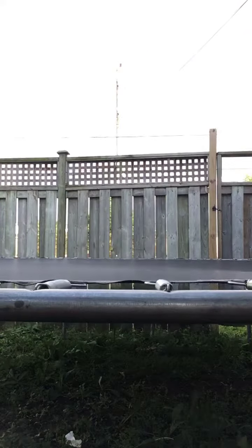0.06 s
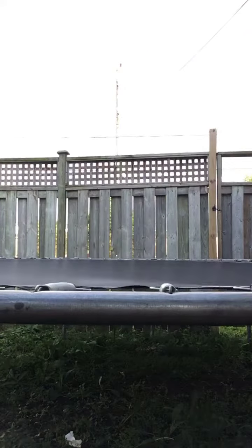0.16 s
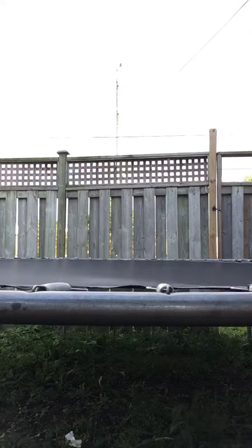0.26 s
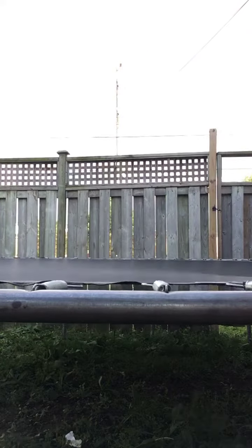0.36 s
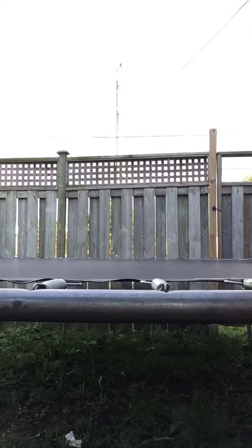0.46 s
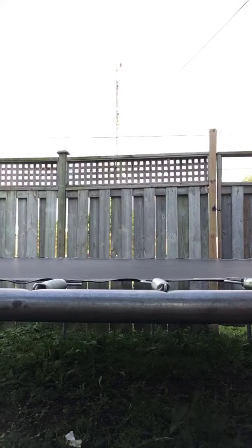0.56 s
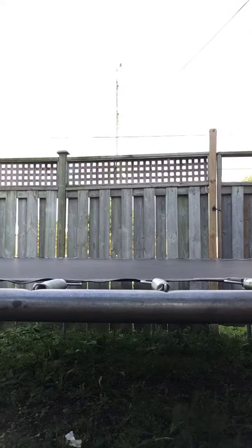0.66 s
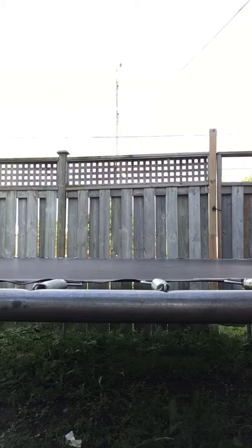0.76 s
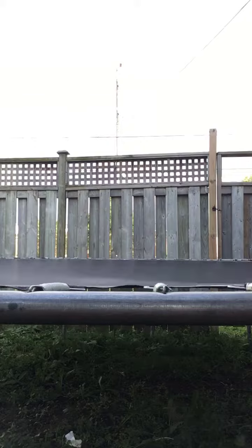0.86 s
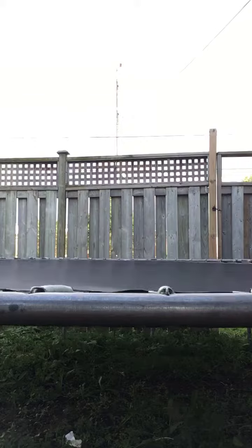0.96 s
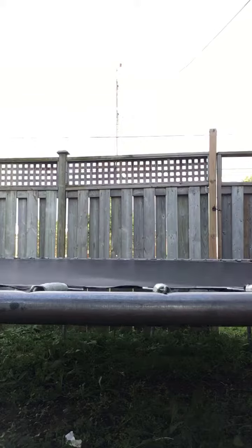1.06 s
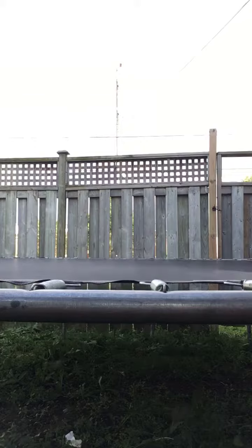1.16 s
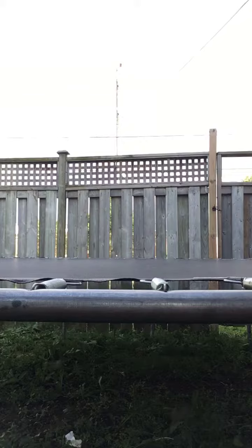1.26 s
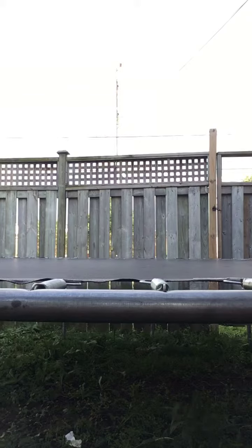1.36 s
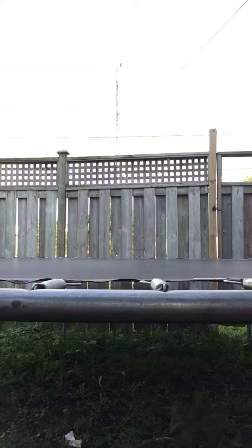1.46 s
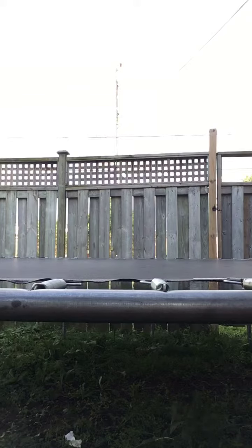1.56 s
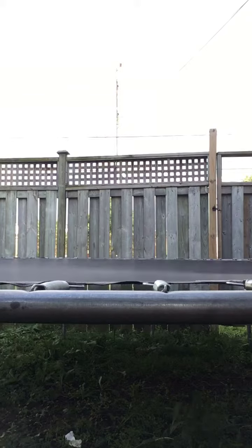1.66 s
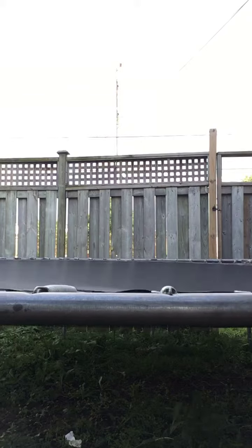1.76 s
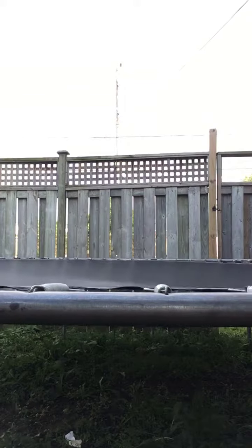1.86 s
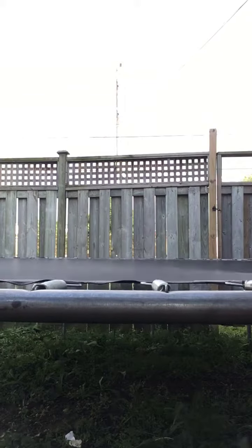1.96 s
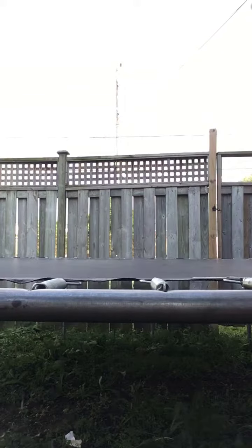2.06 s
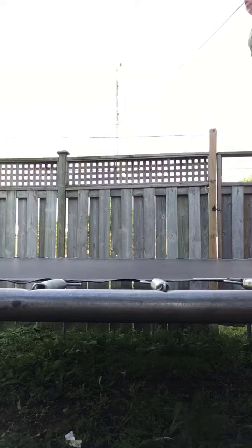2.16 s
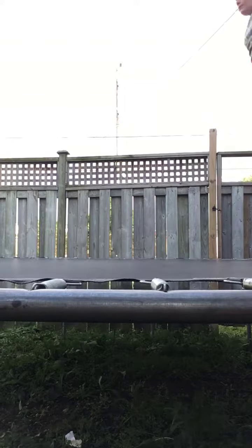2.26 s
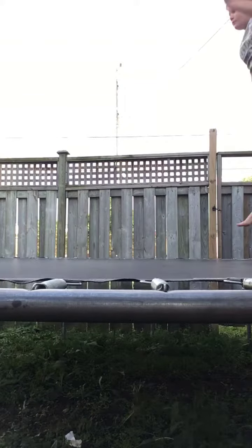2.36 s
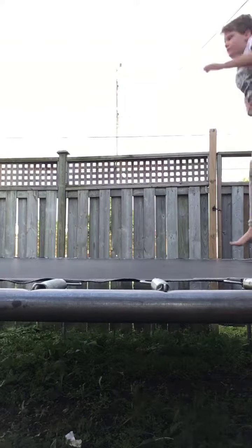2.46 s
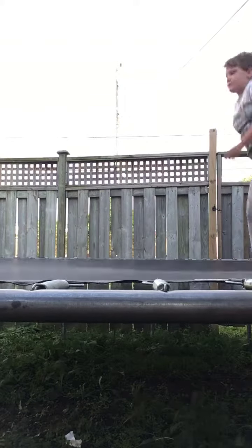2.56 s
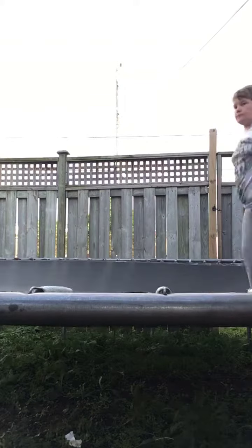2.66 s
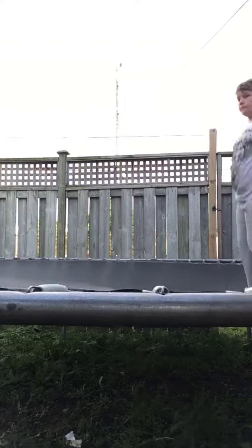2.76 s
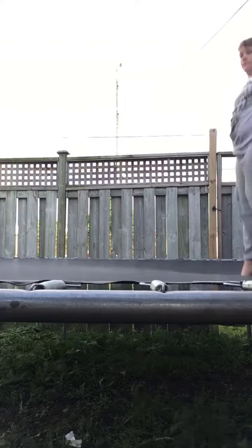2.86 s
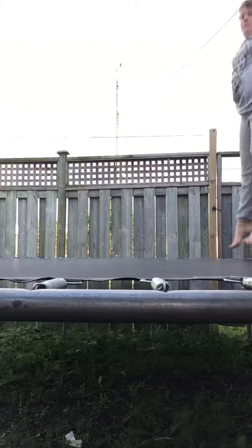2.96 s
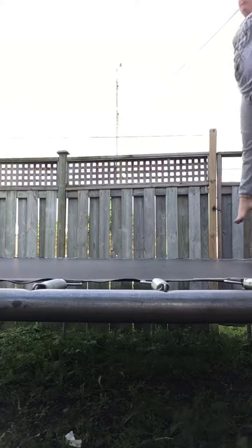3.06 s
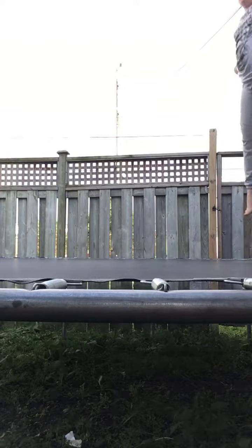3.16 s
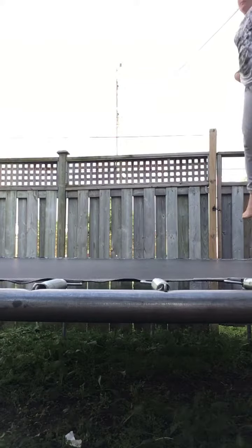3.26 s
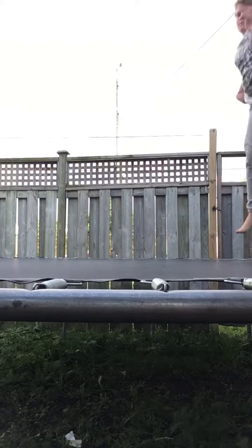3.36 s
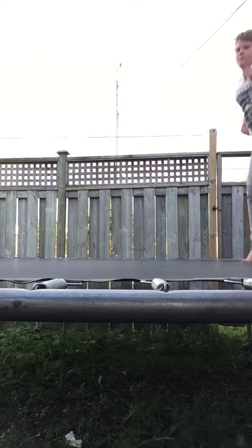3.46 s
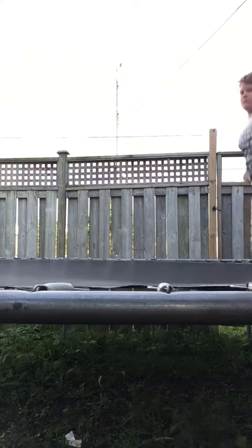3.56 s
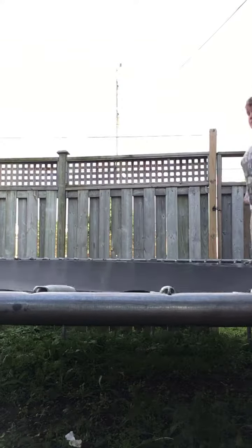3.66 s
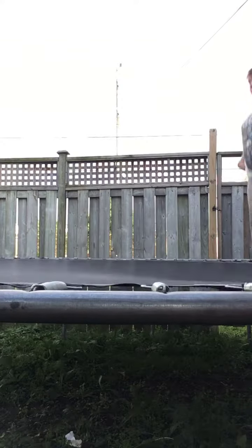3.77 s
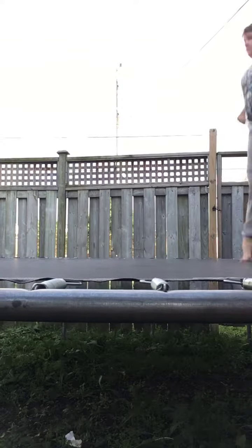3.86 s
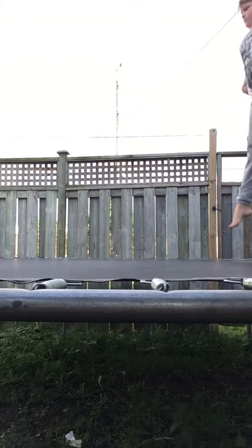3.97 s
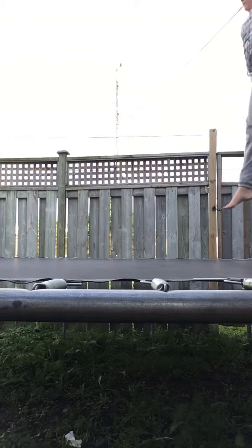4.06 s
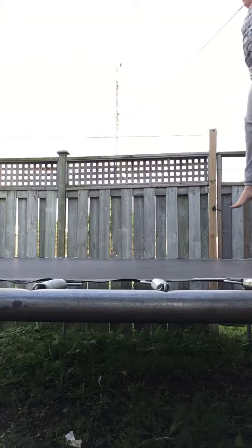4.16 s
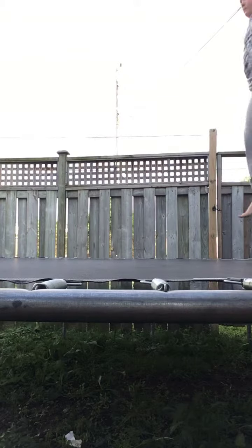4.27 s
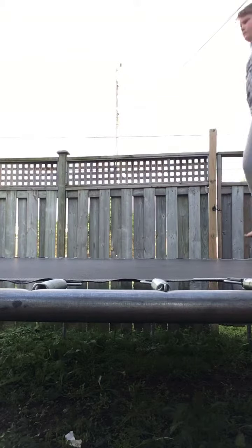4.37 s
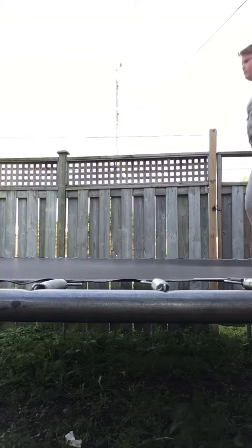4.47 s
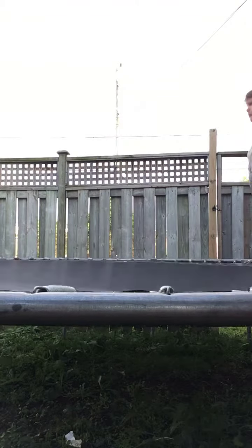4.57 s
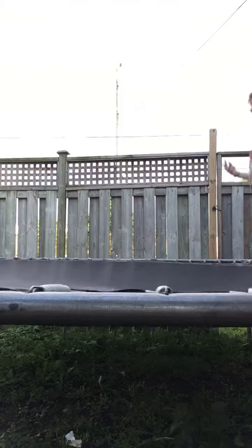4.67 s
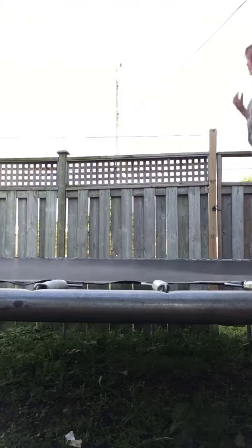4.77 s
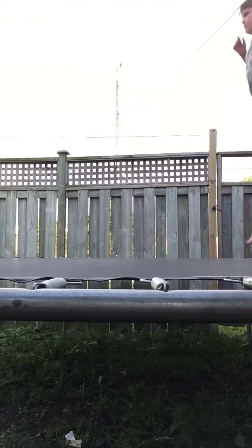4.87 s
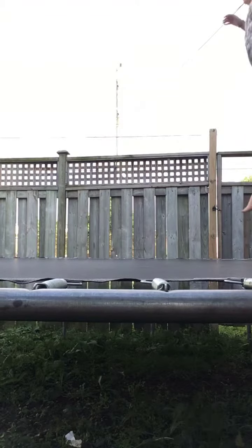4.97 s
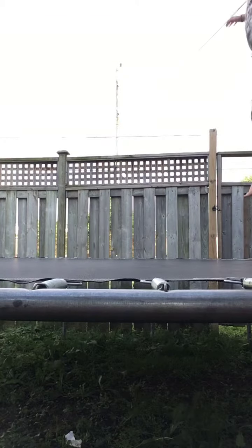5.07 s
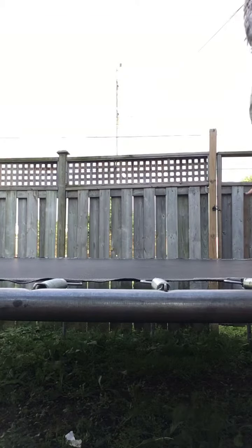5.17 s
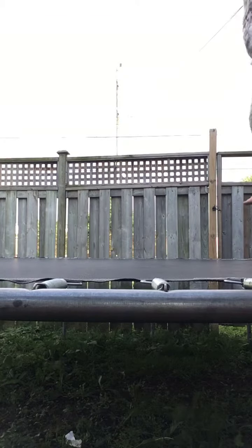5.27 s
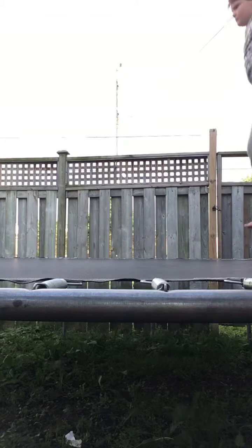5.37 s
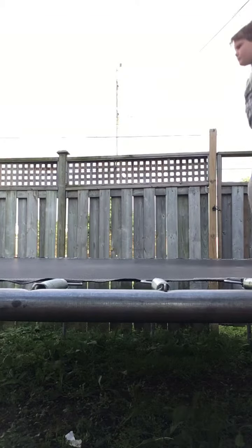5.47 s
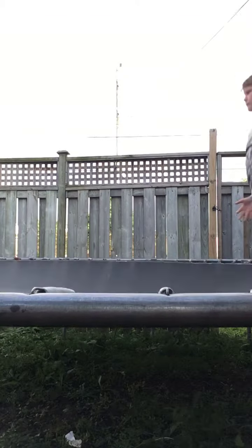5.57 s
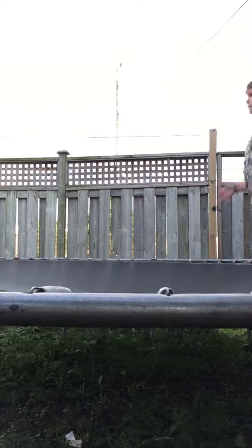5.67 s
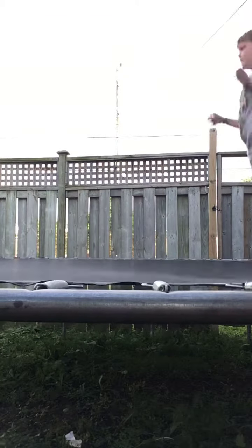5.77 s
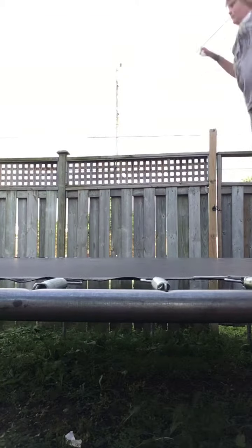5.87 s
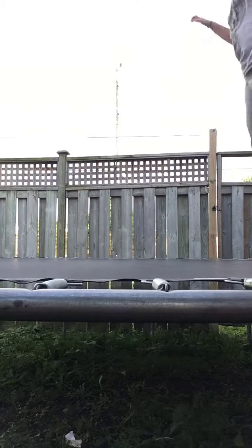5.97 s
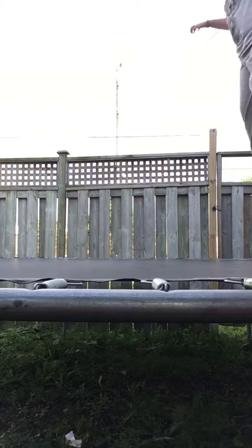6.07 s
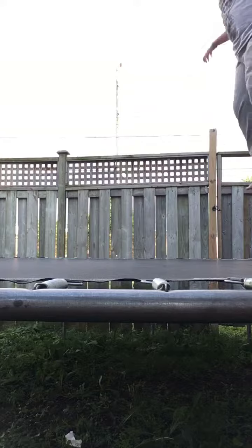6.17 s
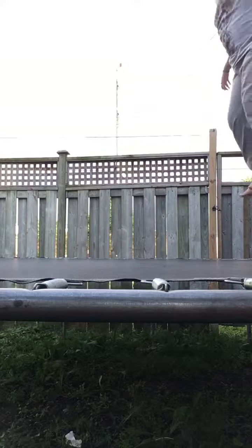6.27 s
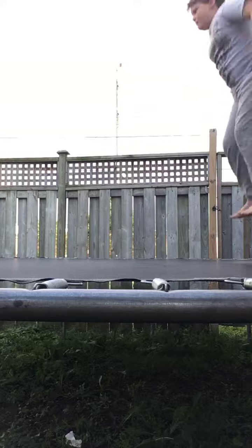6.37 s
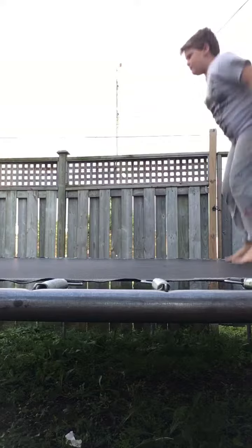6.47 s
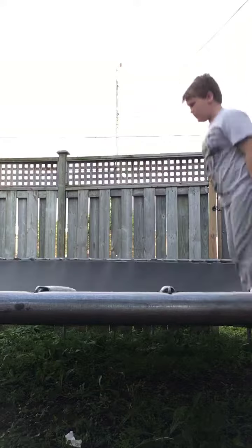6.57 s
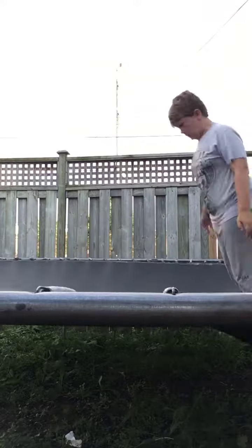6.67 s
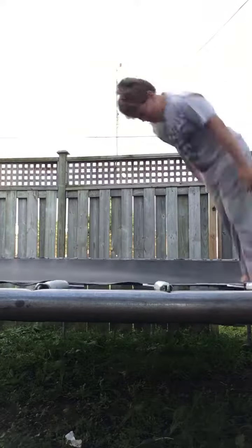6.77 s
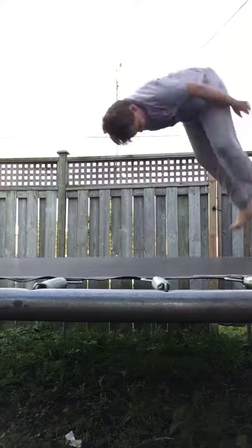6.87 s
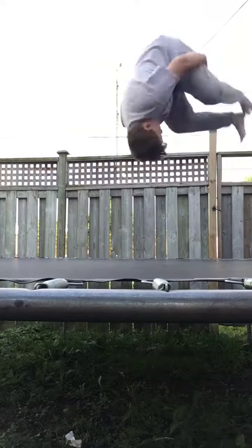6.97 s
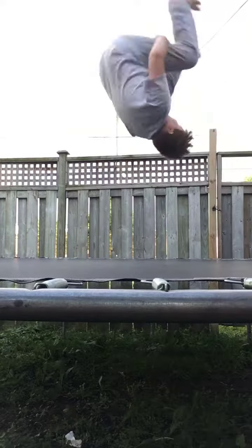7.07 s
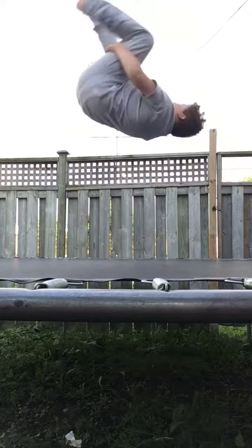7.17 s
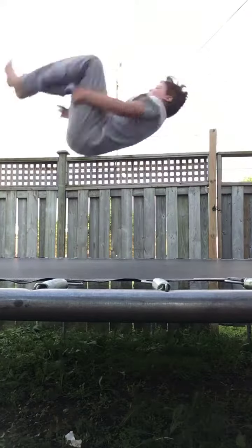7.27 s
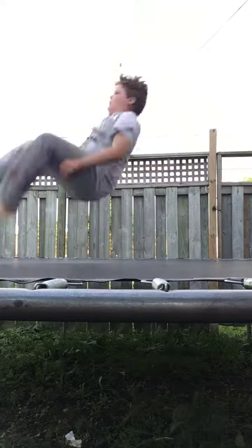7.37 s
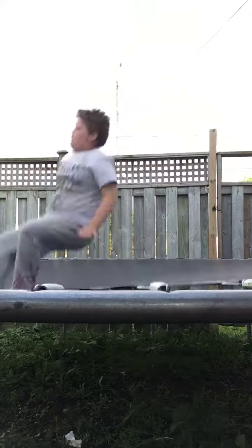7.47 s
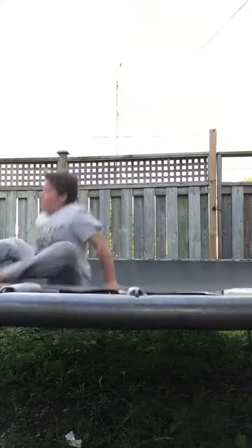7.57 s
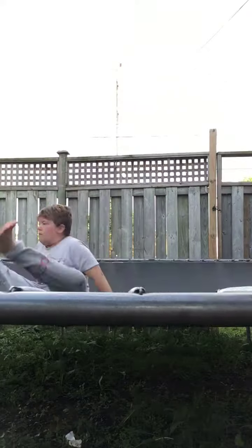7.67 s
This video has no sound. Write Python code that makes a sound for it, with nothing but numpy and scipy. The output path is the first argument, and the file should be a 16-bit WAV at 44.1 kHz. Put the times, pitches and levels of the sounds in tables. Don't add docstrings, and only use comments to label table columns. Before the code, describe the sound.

A phone low beside a backyard trampoline hears about nine bounces. Each begins with a tick of feet, grows into a bright, gritty metallic jangle with cracking slips, then loosens into a lighter rattle. Between bounces there is faint traffic and clean, wavering spring ringing, clearest after five seconds. Soft low buffets accompany the later jumps; the last landing clatters with firm mat knocks. Slight outdoor wall echo.

```python
import sys
import numpy as np
from scipy import signal
from scipy.fft import rfft, irfft, next_fast_len
from scipy.io import wavfile
from scipy.ndimage import uniform_filter1d

SR = 44100
rng = np.random.default_rng(int(sys.argv[2]) if len(sys.argv) > 2 else 0)


def field_ratio(decibels):
    return 10 ** (np.asarray(decibels, dtype=float) / 20)


def wav_record(signal):
    frames = np.transpose(np.atleast_2d(signal))
    bounded = np.clip(frames, -1, 1)
    quanta = np.round(bounded * 32767).astype(np.int16)
    wavfile.write(sys.argv[1], SR, quanta)


N = 340893
STEP = 16


def evened(x):
    return x / np.sqrt(np.mean(x ** 2) + 1e-20)


def coloured(x, points):
    size = next_fast_len(len(x))
    points_hz, points_db = np.transpose(points)
    hz = np.fft.rfftfreq(size, 1 / SR)
    gain = field_ratio(np.interp(np.log(hz + 1), np.log(points_hz + 1), points_db, left=-120, right=-120))
    return evened(irfft(rfft(x, size) * gain, size)[:len(x)])


def drift(size):
    once = uniform_filter1d(rng.standard_normal(N), size)
    return evened(uniform_filter1d(once, size))


def add(mix, s, sound):
    part = mix[round(s * SR):][:len(sound)]
    part += sound[:len(part)]


def mode(x, hz, t60_s):
    r = field_ratio(-60 / (t60_s * SR))
    poles = [1, -2 * r * np.cos(2 * np.pi * hz / SR), r * r]
    return signal.lfilter([1 - r], poles, x) * np.sin(2 * np.pi * hz / SR)


def fading_db(peak_s, rise_s, fall_s):
    t = np.arange(0, N, STEP) / SR - peak_s
    before = (np.maximum(-t, 0) / max(rise_s, .002)) ** 1.305
    after = (np.maximum(t, 0) / max(fall_s, .002)) ** 1.244
    return 27.5 * (before + after)


def yard():
    # (frequency [Hz], density [dB per Hz])
    yard_spectrum = [(13, -57), (22, -41), (40, -13.5), (65, -2.5), (128, -10.5), (150, -14.5), (277, -18),
                     (345, -23), (700, -24), (1370, -26), (1900, -34), (2790, -37.5), (3880, -46.5),
                     (12700, -51.5), (15300, -64), (15800, -60)]
    return field_ratio(-51 + 1.1 * drift(size=6000)) * coloured(rng.standard_normal(N), yard_spectrum)


def slips(per_s, spread_db, hiss):
    size = field_ratio(spread_db * np.minimum(rng.exponential(1, N), 4)) * rng.standard_normal(N)
    clicks = size * (rng.random(N) < per_s / SR)
    return evened(clicks) + hiss * rng.standard_normal(N)


def coils(t60_s, patchy_db):
    coils_hz = [607, 789, 1076, 1220, 1392, 1679, 1780, 1930, 2250, 2386, 2520, 2607, 2827, 3046, 3210,
                3750, 4600, 5230, 5820, 6620, 7004, 8009, 8149, 8393, 8824, 9170, 9700, 11000, 12200]
    shake, out = rng.standard_normal(N), np.zeros(N)
    for hz in np.outer(coils_hz, [1, 1.045]).ravel():
        chance = evened(uniform_filter1d(rng.standard_normal(N // 256 + 1), size=6))
        flare = field_ratio(patchy_db * np.minimum(chance, 2)).repeat(256)[:N]
        out += mode(flare * shake, hz, t60_s)
    return evened(out)


def patchy(x, spread_db):
    z = signal.stft(x, nperseg=256)[2]
    field = uniform_filter1d(rng.standard_normal(z.shape), size=4, axis=0)
    field = evened(uniform_filter1d(field, size=9, axis=1))
    return evened(signal.istft(z * field_ratio(spread_db * field), nperseg=256)[1][:N])


def effort():
    # (time [s], time for hooks to take the load [s])
    touches = [(-.02, .01), (.168, 0.013), (.925, 0.03), (1.783, 0.0066), (2.666, 0.0069), (3.601, 0.0086),
               (4.558, 0.035), (5.589, 0.021), (6.6, 0.02), (7.535, 0.0061)]
    # (peak time [s], hook rasp [dB], rise [s], fall [s], mat scrape above it [dB])
    landings = [(.018, -45, 0.24, 0.093, -1), (.29, -37.5, 0.15, 0.12, -2.5),
                (1.022, -36, 0.092, 0.088, -4), (1.853, -31.5, 0.058, 0.11, -5), (2.69, -47, .3, 0.15, -12),
                (2.772, -36.5, 0.13, 0.18, -2.5), (3.606, -41, .05, 0.026, -11),
                (3.622, -43, 0.017, 0.049, 6.5), (3.749, -34, 0.12, 0.086, -4.5),
                (4.594, -52, 0.078, 0.26, 10.5), (4.706, -33, 0.083, 0.09, -4),
                (5.609, -28.5, 0.023, 0.012, -0.5), (5.64, -38.5, .1, 0.16, -2),
                (5.718, -32.5, 0.15, 0.065, -4), (6.63, -56.5, .1, 0.12, 12),
                (6.734, -32.5, 0.1, 0.071, -1.5), (7.613, -33, 0.058, 0.12, -1)]
    # (peak time [s], hook rasp [dB], rise [s], fall [s], mat scrape above it [dB])
    rebounds = [(.534, -45, 0.17, 0.13, -1), (1.19, -51.5, 0.47, 0.17, 2.5), (1.309, -42, .2, 0.087, -3),
                (1.996, -51, 0.13, 0.026, -3), (2.091, -42.5, 0.13, 0.15, -1.5),
                (2.872, -36.5, 0.0076, 0.03, -6.5), (2.914, -41, 0.04, 0.28, -4),
                (3.04, -51.5, 0.21, 0.25, -3.5), (3.185, -61, .04, 0.04, -3),
                (3.1, -53.5, 0.47, 0.044, 7.5), (3.878, -41, 0.088, 0.089, -1.5),
                (3.935, -41.5, 0.033, 0.12, -4), (4.04, -60.5, 0.28, 0.13, 9.5),
                (4.798, -38.5, 0.03, 0.19, -2.5), (4.992, -48, 0.1, 0.15, 0.5),
                (5.824, -42.5, 0.04, 0.12, -1), (5.909, -41, 0.098, 0.11, -3), (6.03, -50.5, 0.15, 0.12, 6),
                (6.977, -42, 0.41, 0.11, -0.5), (7.104, -54, 0.18, 0.063, 3), (7.72, -37, 0.032, 0.23, -8)]
    # (time [s], peak level [dB], low knock above it [dB])
    snaps = [(.2009, -26, 4), (.2285, -21, 0.5), (.2528, -10.5, -7), (.313, -14, -4), (.947, -26, -12),
             (.96, -26, -8), (1.152, -46, -10), (2.728, -23, 5), (3.921, -23, -11), (.9842, -18.5, -2.5),
             (1.26, -23, -8), (1.7928, -25.5, -24), (1.839, -25, -17.5), (2.6708, -28, -8),
             (2.8694, -27, -15), (2.9098, -21, -18), (3.6074, -21, -12), (3.695, -19, 1), (3.8602, -21, -1),
             (4.5854, -16.5, -16), (4.6848, -22, -32), (4.7855, -16.5, -1.5), (4.9816, -19, -2),
             (4.992, -26, 8.5), (2.739, -26, 4), (2.8, -22, 0), (4.72, -23, -5), (6.755, -26, 4),
             (.275, -26, -3), (5.5937, -24, 11), (5.8214, -22, -33), (5.882, -17.5, -3.5), (5.99, -21, -1),
             (6.6195, -20.5, 10.5), (6.6792, -15, -13), (6.818, -15.5, 0), (6.8957, -19.5, -24),
             (7.5403, -23.5, 2), (7.5816, -18, -18), (7.7157, -19, -6)]
    # (time [s], peak level [dB], low knock above it [dB])
    ticks = [(.165, -35, 2), (.437, -34, 7), (.624, -30.5, 2.5), (.8485, -45, 4), (.863, -37.5, -4),
             (1.7337, -33.5, -3), (2.2822, -39, -5), (2.459, -40, 7.5), (2.6354, -44, -2),
             (3.1747, -49, -8), (3.3833, -38.5, -4), (3.5833, -47, 8), (4.047, -27.5, -7),
             (4.5381, -59, -2.5), (4.559, -35.5, -3), (5.085, -29.5, -1), (5.212, -46, 14), (5.25, -47, 8),
             (5.34, -60, 22), (5.4, -62, 18), (5.4745, -59.5, 21.5), (5.5648, -42.5, 14.5),
             (6.068, -26, -12), (6.2088, -38, 5.5), (6.5993, -47, 14), (7.227, -51, 14), (7.2644, -45.5, 4),
             (7.526, -36, 1)]
    slack_db, stroke_frame_db = -11.5, -7.5
    mat_lag, frame_lag = 0.38, 0.11

    power, now = 0, np.arange(0, N, STEP) / SR
    for s, db, rise_s, fall_s, mat_db in [*landings, *rebounds]:
        touch_s, grip_s = [row for row in touches if row[0] < s][-1]
        slack = np.clip(1 - (now - touch_s) / grip_s, 0, 1)
        grip = (now > touch_s) * field_ratio(slack_db * slack)
        kept = np.outer([1, 1 - mat_lag, 1 - frame_lag], fading_db(s, rise_s, fall_s))
        shares_db = np.array([[0], [mat_db], [stroke_frame_db]])
        power = power + (grip * field_ratio(db + shares_db - kept)) ** 2
    power = power.repeat(STEP, axis=1)[:, :N]

    t = np.arange(SR // 4) / SR
    for rows, rise_s, t60_s, frame_db in ((snaps, .0006, .2, -9.5), (ticks, .0025, .23, -9)):
        jolt = (1 - np.exp(-t / rise_s)) * (1 + .5 * np.exp(-t / .004))
        for s, db, knock_db in rows:
            shape = jolt * field_ratio(db - 22.0 - 60 * t / t60_s)
            for part, share_db in zip(power, (0, knock_db, frame_db)):
                add(part, s - .0006, (shape * field_ratio(share_db)) ** 2)
    return np.sqrt(power)


def rasp():
    # (frequency [Hz], density [dB per Hz])
    hook_spectrum = [(3710, -41), (6300, -10.5), (6940, -4), (7460, -2.5), (8120, 0), (8980, 0),
                     (10400, -4), (15200, -9.5), (15800, -14)]
    # (frequency [Hz], density [dB per Hz])
    mat_spectrum = [(210, -67), (350, -11), (503, -13.5), (585, -5), (832, -5), (1160, 0.5), (2270, -2),
                    (2550, -0.5), (4500, -8.5), (5850, -46), (9900, -120)]
    # (frequency [Hz], density [dB per Hz])
    frame_spectrum = [(2800, -15), (3600, -9), (4800, -2), (6200, 1.5), (7500, -10)]
    jangle = coils(t60_s=.055, patchy_db=6)
    hooks = patchy(evened(slips(6000, 2.1, 1.1)) + .55 * jangle, 1.7)
    mat = patchy(evened(slips(2500, 1.8, 1.0)) + 0.38 * jangle, 1.7)
    tugs = field_ratio(1.1 * drift(size=150))
    bright, low, middle = effort() * tugs
    scrape = low * coloured(mat, mat_spectrum)
    hums_hz = np.linspace(2200, 3100, 24) + rng.uniform(-15, 15, size=24)
    hum = sum(mode(scrape, hz, .6) for hz in hums_hz)
    hook_rasp = bright * coloured(hooks, hook_spectrum)
    frame_rasp = middle * coloured(hooks + mat, frame_spectrum)
    return hook_rasp + frame_rasp + scrape + field_ratio(2) * hum


def fence(x):
    t = np.arange(SR // 3) / SR
    signs = rng.choice([-1., 1.], len(t))
    hits = rng.random(len(t)) < .05
    tail = signs * hits * field_ratio(-60 * t / 0.34) * (t > .008)
    tail = signal.lfilter([1], [1, -.45], tail)
    return signal.fftconvolve(x, tail / np.linalg.norm(tail))[:N]


def knocks():
    # (time [s], peak level [dB], mat note [Hz])
    strikes = [(0.2004, -29, 1160), (0.2527, -32, 1680), (0.312, -33, 1450), (0.923, -31.5, 1080),
               (1.768, -32.5, 1100), (1.791, -36, 2060), (2.695, -20, 1084), (4.585, -25.5, 920),
               (4.991, -27, 1148), (5.548, -35, 970), (5.595, -19, 1710), (5.607, -13, 1175),
               (5.607, -19, 1950), (3.6185, -25.5, 1775), (3.624, -22.5, 1140), (5.987, -26.5, 885),
               (6.572, -32, 600), (6.62, -24, 1295), (7.519, -26.5, 900), (7.541, -38, 1890),
               (7.62, -14, 1006), (7.62, -21, 1530), (6.619, -21, 2010), (2.679, -30, 1710),
               (0.2291, -25.5, 980), (7.668, -22, 717), (7.721, -16.5, 1340)]
    out, t = np.zeros(N), np.arange(SR // 8) / SR
    rough = rng.standard_normal((len(strikes), len(t)))
    for (s, db, hz), noise in zip(strikes, rough):
        note = np.sin(2 * np.pi * hz * t) + 0.93 * evened(mode(noise, 1.15 * hz, 0.0023))
        note = note * field_ratio(-60 * t / 0.071) * np.minimum(t / 0.0012, 1)
        tick = 0.8 * uniform_filter1d(noise, size=5) * np.exp(-t / 0.00093)
        add(out, s, field_ratio(db - 12.5) * (note + tick))
    return signal.lfilter(*signal.butter(2, 550, "high", fs=SR), out)


def rustles():
    # (time [s], peak level [dB], t60 [s])
    thread_rubs = [(.437, -53, 0.28), (.624, -63, 0.18), (1.735, -72, 0.14), (1.93, -56, .2),
                   (1.99, -52, .15), (.863, -62, 0.17), (1.152, -66, .2), (2.46, -70, 0.26),
                   (4.59, -52, .15), (4.72, -42, .2), (4.914, -50, .15), (4.955, -58, .15),
                   (4.982, -38, 0.12), (5.548, -64, .1), (5.99, -49, .2), (6.012, -52, 0.13),
                   (6.068, -58, 0.18), (6.977, -48, 0.15), (6.71, -59, .2), (6.9, -64, .2)]
    # (frequency [Hz], density [dB per Hz])
    weave_spectrum = [(9000, -30), (11500, -1), (13500, -4), (15700, -4)]
    power, t = np.zeros(N), np.arange(SR // 4) / SR
    for s, db, t60_s in thread_rubs:
        swell = (1 - np.exp(-t / 0.0019)) * field_ratio(db - 60 * t / t60_s)
        add(power, s, swell ** 2)
    return np.sqrt(power) * coloured(slips(5000, 2.5, .8), weave_spectrum)


def squeaks():
    # (time [s], length [s], frequency [Hz], level [dB])
    tones = [(.948, .04, 1282, -46), (1.117, .008, 1030, -45), (.996, .035, 780, -48),
             (2.838, .02, 1660, -46), (4.925, .015, 1000, -50), (2.73, .02, 2700, -47),
             (1.736, .045, 7020, -65), (1.39, .12, 8000, -70), (2.908, .014, 5810, -46),
             (2.908, .014, 8850, -44), (2.903, .022, 1880, -45), (3.862, .032, 8820, -45),
             (4.788, .028, 5820, -39), (4.787, .055, 8820, -47), (4.685, .05, 8900, -44),
             (4.585, .05, 6550, -53), (4.8, .03, 1920, -44), (4.982, .015, 6420, -41),
             (4.98, .008, 7350, -42), (5.604, .006, 5600, -36), (4.992, .05, 2616, -45),
             (4.998, .03, 5378, -54), (5.01, .06, 4608, -59), (5., .045, 6885, -52), (5., .045, 4037, -55),
             (5.64, .05, 790, -44), (5.814, .014, 3550, -46), (5.822, .016, 8820, -44),
             (5.82, .01, 10500, -47), (6.985, .02, 8050, -47), (6.006, .03, 1428, -37),
             (6.04, .04, 1425, -52), (6.012, .03, 4045, -47), (6.02, .04, 5370, -52), (6.01, .03, 7140, -51),
             (6.058, .025, 3010, -55), (6.02, .05, 2500, -52), (6.045, .04, 4050, -60),
             (6.985, .012, 1470, -40), (7.604, .05, 2400, -41), (6.015, .04, 4620, -58),
             (3.619, .06, 2530, -47), (3.645, .014, 2650, -46), (3.69, .01, 1850, -46),
             (6.988, .012, 4100, -48), (7.592, .045, 750, -43), (4.64, .07, 790, -48),
             (6.978, .012, 14000, -46), (6.75, .025, 8050, -44), (6.99, .025, 13500, -53),
             (.44, .025, 14300, -62), (.44, .02, 12900, -62), (6.705, .04, 9150, -46)]
    out = np.zeros(N)
    waver_s = np.cumsum(1 + .004 * drift(size=120)) / SR
    for s, length_s, hz, db in tones:
        t = np.arange(0, length_s + .05, 1 / SR)
        fade_db = -90 * t - 800 * np.maximum(t - length_s, 0)
        swell = np.minimum(t / .004, 1) * field_ratio(fade_db)
        tone = np.sin(2 * np.pi * hz * waver_s[round(s * SR):][:len(t)])
        add(out, s, field_ratio(db + 4) * swell * tone)
    return out * field_ratio(3 * drift(size=90))


def springs():
    # (time [s], frequency [Hz], level [dB], t60 [s])
    rings = [(.63, 2397, -63, 1.3), (2.19, 2395, -62, .9), (1.38, 2390, -68, 1.1), (3.12, 2386, -61, 2.2),
             (3.12, 2397, -69, 2.), (3.12, 2830, -70, 1.5), (3.12, 2251, -70, 1.2), (4., 2387, -68, 2.4),
             (4., 2417, -68, 2.4), (4.99, 2454, -56, 3.), (4.99, 2482, -56, 1.), (4.99, 2522, -54, .8),
             (4.99, 2494, -64, 3.), (6., 2455, -57, 3.), (6., 2494, -61, 2.3), (6., 2522, -62, 3.),
             (6.977, 2454, -49, 1.1), (6.977, 2484, -55, 2.6), (6.977, 2526, -55, 1.),
             (6.99, 2419, -65, 2.), (6.985, 2640, -53, .25), (7.04, 2606, -54, .5), (6.99, 2250, -58, .4),
             (7.05, 2832, -63, .7), (6.01, 2622, -59, .45), (6.01, 2708, -60, .4), (4.995, 2998, -54, .2),
             (4.995, 2616, -56, .35), (5.02, 2250, -63, .6), (5.08, 2810, -60, .3), (5.23, 2620, -63, .3),
             (2.19, 2514, -57, .45), (2.19, 2853, -66, .9), (3.12, 3009, -66, .4)]
    out, t = np.zeros(N), np.arange(0, .66, 1 / SR)
    for (s, hz, db, t60_s), phase in zip(rings, rng.random(len(rings))):
        sway = .45 * np.sin(2 * np.pi * (5 + 9 * phase) * t)
        ring = field_ratio(db + 4.5 - 60 * t / t60_s) * np.sin(2 * np.pi * (hz * t + phase) + sway)
        add(out, s, ring * signal.windows.tukey(len(t), .025))
    return out * field_ratio(1.8 * drift(size=900))


def steadied(x, size):
    return evened(x / (uniform_filter1d(x ** 2, size) + .1) ** .4)


def air():
    # (peak time [s], level [dB], rise [s], fall [s], flutter above it [dB])
    puffs = [(2.68, -48, 0.23, .12, -4), (3.59, -51, .1, 0.25, 2), (5.895, -45, 0.036, 0.067, -5),
             (6.575, -47, 0.031, 0.059, 7), (4.43, -44, 0.11, .04, -27), (4.56, -39.5, 0.031, 0.093, -7),
             (4.72, -35, 0.24, 0.071, -5), (4.83, -37, 0.27, 0.07, -10.5), (5.09, -43, 0.26, 0.09, -9),
             (5.45, -54, 0.71, .2, -20), (5.57, -35.5, 0.057, 0.2, -5), (5.71, -40, 0.27, 0.043, -4.5),
             (5.84, -45, 0.12, 0.44, -10), (6.36, -36, 0.12, 0.074, -39), (6.48, -39, 0.23, 0.01, -32),
             (6.55, -42, 0.013, 0.39, -2.5), (6.77, -35, 0.097, 0.08, -14), (7.02, -45, 0.57, 0.79, -10),
             (7.18, -34.5, 0.15, 0.046, -19), (7.259, -38, 0.14, 0.019, -16),
             (7.362, -32, 0.018, 0.087, -6), (7.42, -42.5, .1, 0.091, -9), (7.53, -41, 0.025, 0.22, 6.5),
             (7.669, -35, 0.019, 0.077, 7), (7.72, -41, 0.067, .3, -12)]
    # (centre time [s], peak level [dB], frequency [Hz], length each side [cycles])
    gusts = [(4.638, -24.5, 75, 0.75), (4.6865, -28, 62.3, 2.3), (4.706, -21.5, 125, 1.05),
             (4.7177, -20.5, 80, 1.6), (4.732, -25, 48.3, 2.8), (4.713, -33, 276, 2.8),
             (5.556, -29, 85, 0.89), (5.64, -33, 66, 2.5), (5.669, -37, 64, 2), (5.714, -34, 70.5, 1.9),
             (5.896, -31.5, 95, 2), (7.564, -49, 140, 1), (7.685, -29, 70, 1.4), (7.715, -30, 55, 1.8),
             (5.827, -30.5, 80.6, 1.1), (6.763, -23, 154, 3.8), (6.783, -33, 59, 3.6),
             (7.165, -27, 70, 0.86), (7.18, -26.5, 72, 1), (7.243, -34, 75, 1.1), (6.36, -34, 62, 2.2),
             (6.468, -34, 110, 1), (7.374, -24.5, 101, 1.2), (7.411, -28, 110, 1.04),
             (7.523, -28, 257, 0.96), (7.5277, -30, 72, 2), (7.6726, -28, 92, 1.2)]
    power = 0
    for s, db, rise_s, fall_s, flutter_db in puffs:
        peaks_db = np.array([[db], [db + flutter_db]])
        power = power + field_ratio(peaks_db - fading_db(s, rise_s, fall_s)) ** 2
    push, flutter = np.sqrt(power).repeat(STEP, axis=1)[:, :N]
    low = coloured(rng.standard_normal(N), [(25, -47), (40, -6.5), (62, 2.5), (85, -7.5), (120, -14.0)])
    upper = coloured(rng.standard_normal(N), [(90, 6.0), (125, -5.5), (200, -7), (350, -19.5), (600, -29.5)])
    out = field_ratio(-1) * (push * steadied(low, size=1200) + flutter * steadied(upper, size=700))
    for s, db, hz, cycles in gusts:
        u = np.arange(-cycles, cycles, hz / SR)
        bell = np.exp(-(2.92 * u / cycles) ** 2)
        sinking = np.sin(2 * np.pi * (u - 0.16 * u ** 2))
        add(out, s - cycles / hz, field_ratio(db) * bell * sinking)
    return out


def scene():
    squeal = squeaks()
    trampoline = rasp() + knocks() + .5 * squeal + rustles()
    near_squeal = .5 * squeal
    mix = trampoline + field_ratio(-13.5) * fence(trampoline) + near_squeal + springs() + air() + yard()
    return mix[None]


def band_limit(x):
    return signal.sosfilt(signal.butter(12, 15960, fs=SR, output="sos"), x)


def record(dry):
    edge = signal.firwin(255, 15850, window=("kaiser", 8), fs=SR)
    limited = signal.oaconvolve(dry, edge[None], "same")
    return band_limit(limited)


dry = scene()
out = record(dry)
wav_record(out)
```